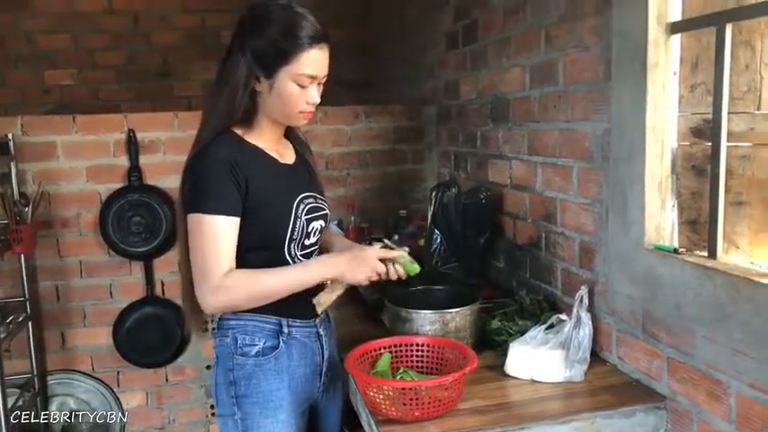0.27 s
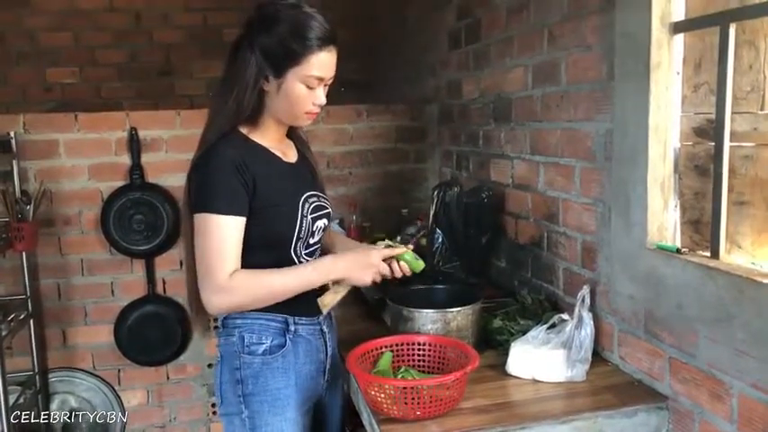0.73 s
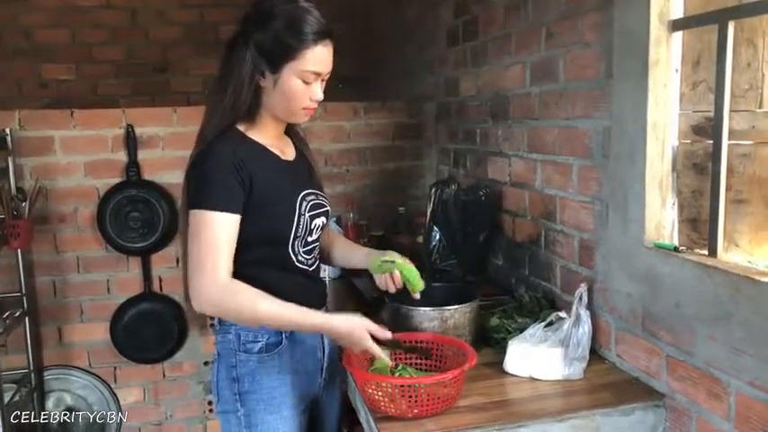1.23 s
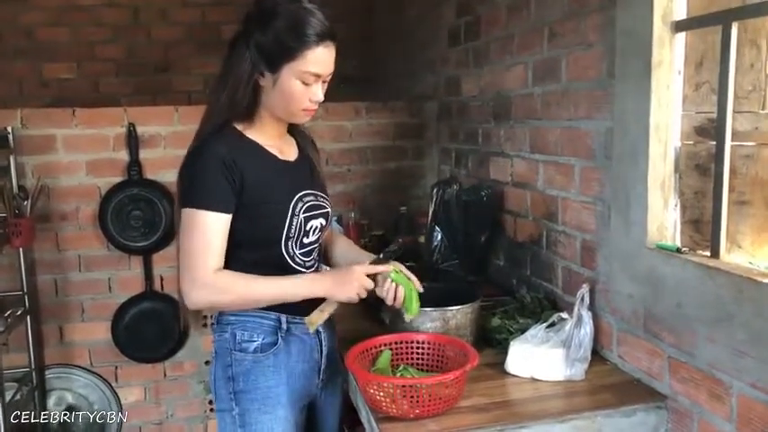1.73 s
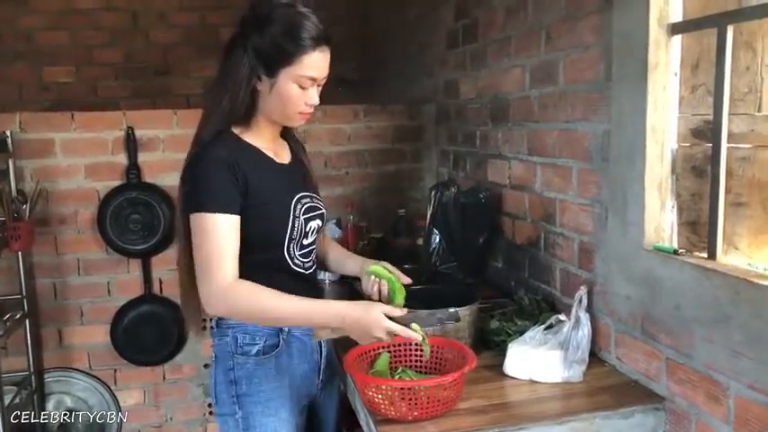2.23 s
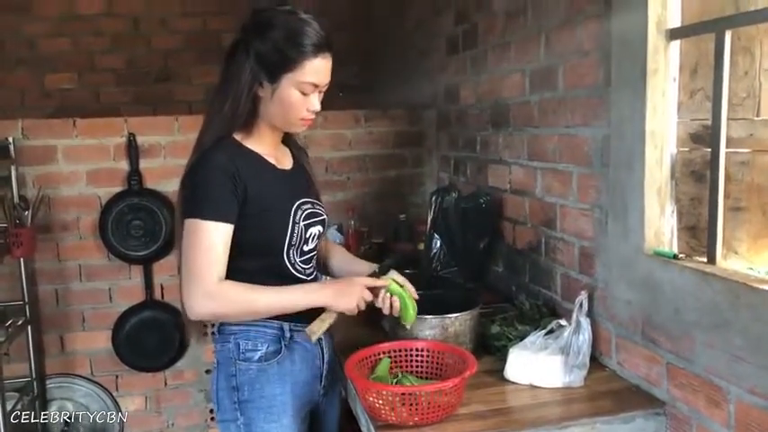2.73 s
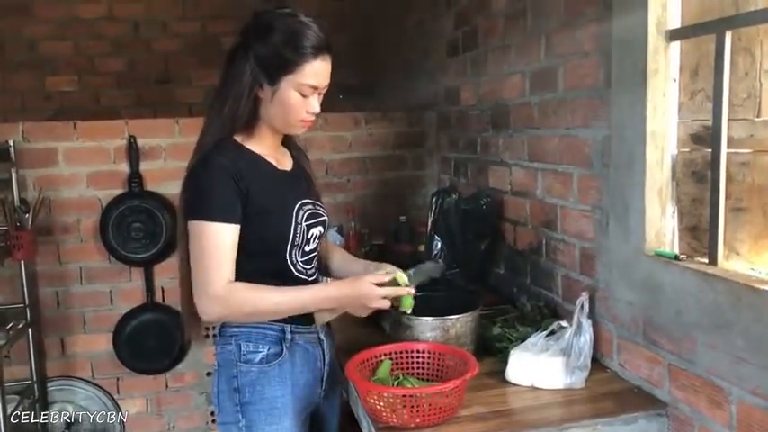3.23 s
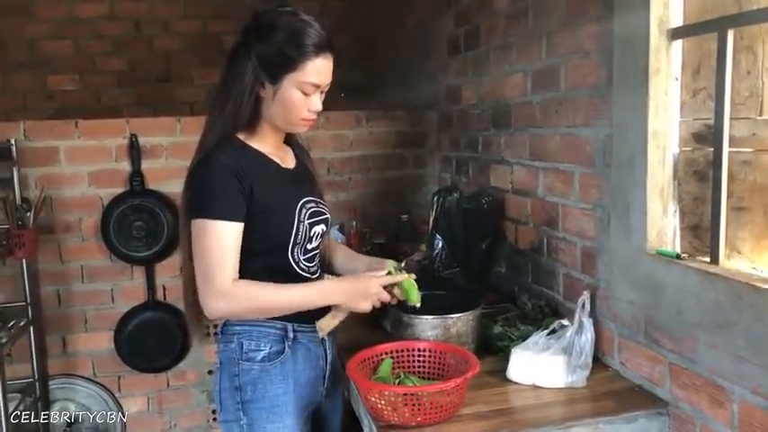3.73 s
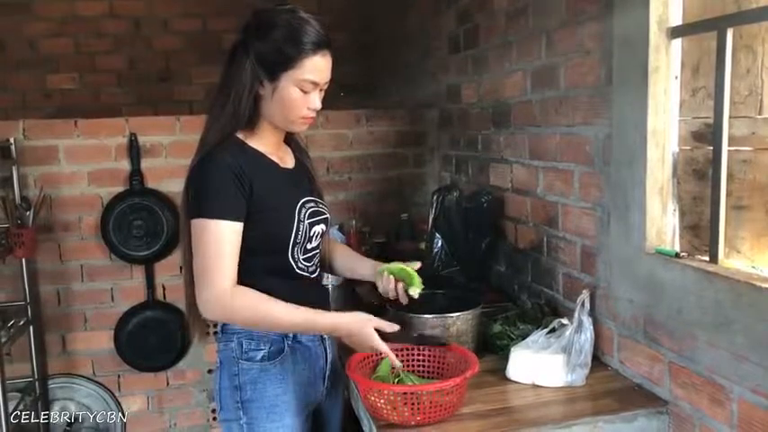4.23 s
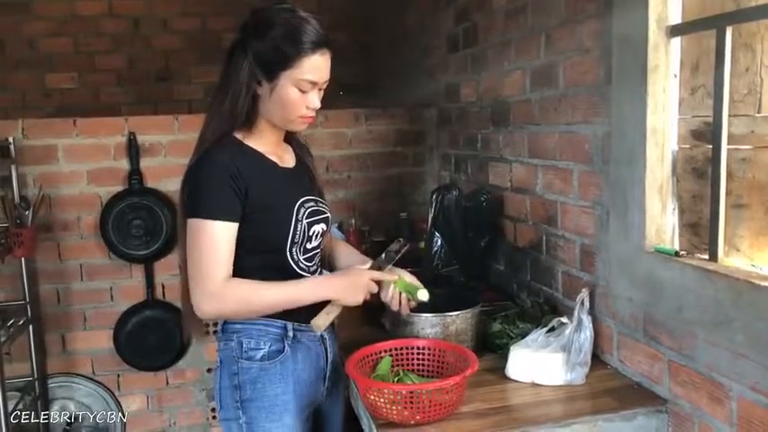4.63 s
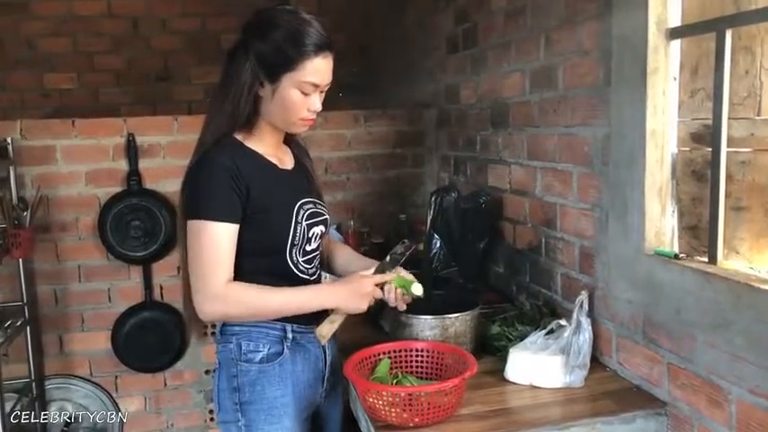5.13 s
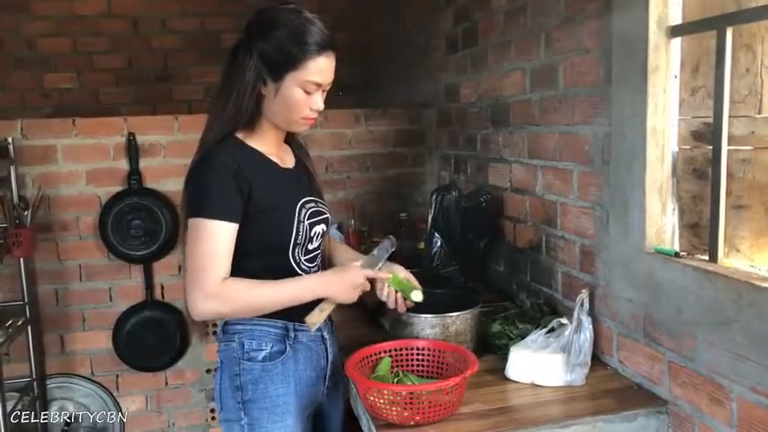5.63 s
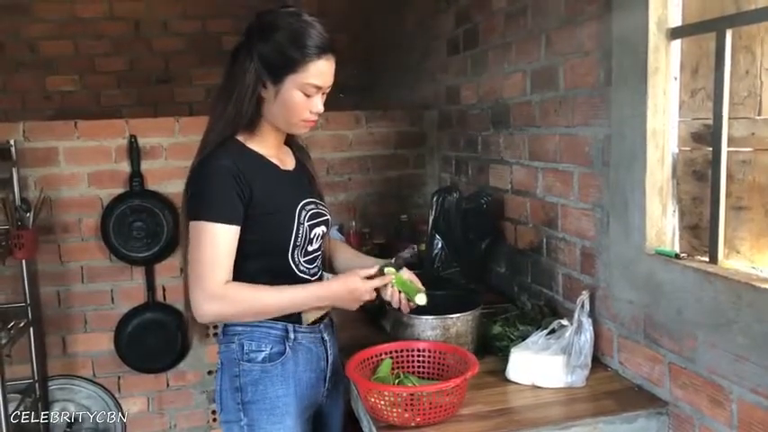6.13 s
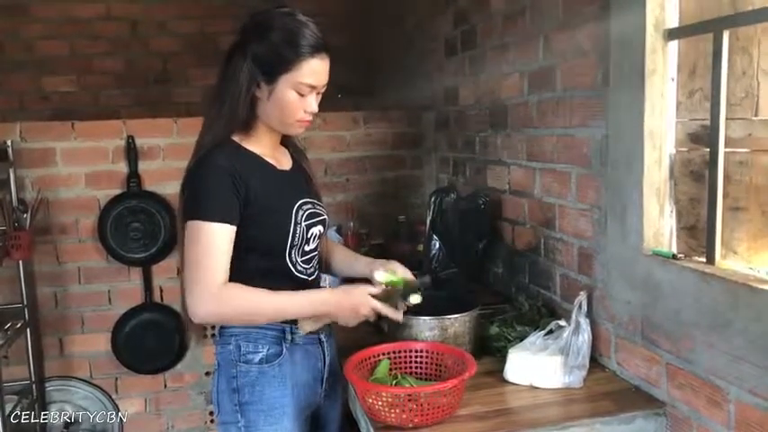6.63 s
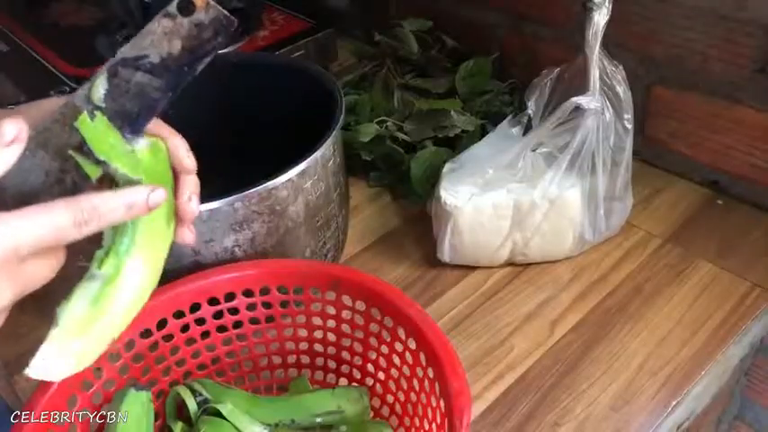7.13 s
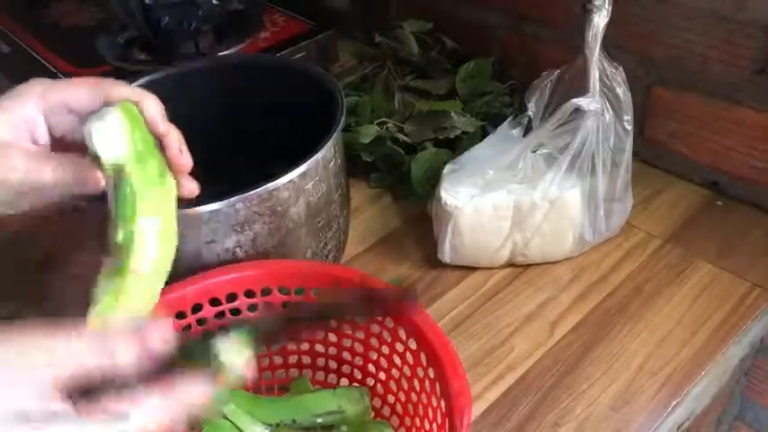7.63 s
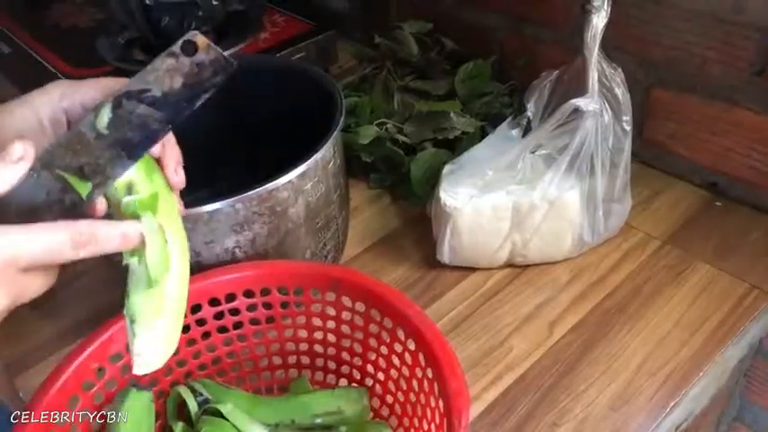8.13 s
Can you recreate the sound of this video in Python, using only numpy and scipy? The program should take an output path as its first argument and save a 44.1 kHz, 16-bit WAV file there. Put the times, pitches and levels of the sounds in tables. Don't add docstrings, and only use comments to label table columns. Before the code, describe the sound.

Crisp wet shaving strokes come in uneven groups with pauses, each a fraction of a second, mixing midrange scrape, fine bright fizz and fibre snaps. A fuzzy metallic flutter leads into a woody, sinking scuff halfway through, then more cuts and a firm chop near the end. Quiet indoor hush, thin insect shimmer and a distant idling engine continue behind; the engine pulls harder after the late scene change. Close microphone, small hard room.

```python
import sys
import numpy as np
from scipy import signal
from scipy.fft import rfft, irfft, next_fast_len
from scipy.io import wavfile
from scipy.ndimage import uniform_filter1d

SR = 44100
rng = np.random.default_rng(int(sys.argv[2]) if len(sys.argv) > 2 else 0)


def how_loud(loudness_db):
    steps = np.asarray(loudness_db, float) / 20
    return 10 ** steps


def unload_wav(signal):
    wavfile.write(
        sys.argv[1],
        SR,
        np.round(np.clip(np.atleast_2d(signal).T, -1, 1) * 32767).astype(np.int16),
    )


N = 369558
T = np.arange(N) / SR

# frequency [Hz], level [dB].
FIZZ_COLOUR = [(3820, -22), (6500, -10), (8530, -4), (11000, -8), (12100, -9.5), (13400, -12), (15100, -24),
               (15600, -23)]


def evened(x):
    return x / np.sqrt(np.mean(x ** 2) + 1e-20)


def shaped(x, points):
    f, db = np.transpose(points)
    n = next_fast_len(len(x), real=True)
    hz = np.fft.rfftfreq(n, 1 / SR)
    gain = how_loud(np.interp(np.log(hz + 1), np.log(f + 1), db))
    return evened(irfft(rfft(x, n) * gain, n)[:len(x)])


def resonate(x, hz, width):
    r = np.exp(-np.pi * width / SR)
    if np.isscalar(hz):
        return 2 * signal.lfilter([1 - r], [1, -r * np.exp(2j * np.pi * hz / SR)], x + 0j).real
    turn = np.exp(2j * np.pi * np.cumsum(hz) / SR)
    return 2 * (turn * signal.lfilter([1 - r], [1, -r], x / turn)).real


def modes(x, table, widen):
    return evened(sum(how_loud(db) * resonate(x, hz, width * widen) for hz, width, db in table))


def add(mix, s, sound):
    part = mix[round(s * SR):][:len(sound)]
    part += sound[:len(part)]


def unrolled(rows):
    s, *columns = np.transpose(rows)
    t = np.arange(s[0], s[-1], 1 / SR)
    return s[0], [np.interp(t, s, c) for c in columns]


def patchy(x, db):
    z = signal.stft(x, nperseg=256, noverlap=192)[2]
    field = uniform_filter1d(rng.standard_normal(z.shape), size=3, axis=0)
    field = uniform_filter1d(field, size=9, axis=1)
    return evened(signal.istft(z * how_loud(db * evened(field)), nperseg=256, noverlap=192)[1][:len(x)])


def tearing(n, per_s, spread_db, lumpy_db, patchy_db):
    chance, size, hiss, slip = rng.random((n, 4)).T
    strength = how_loud(spread_db * np.minimum(-np.log(1 - size), 4))
    fibres = np.sign(hiss - .5) * strength * (chance < per_s / SR)
    clumps = evened(uniform_filter1d(slip - .5, size=180))
    torn = evened(fibres) + 1.01 * evened(hiss - .5)
    return patchy(torn * how_loud(lumpy_db * clumps), patchy_db)


def strokes():
    # frequency [Hz], level [dB].
    flesh_colour = [(300, -11), (1000, -8.5), (1700, -6.5), (2100, 1), (2700, 1), (3500, 0), (4300, -4),
                    (7000, -30)]
    # frequency [Hz], level [dB].
    edge_colour = [(2500, -33), (3800, -3.5), (4500, -4), (5600, -2), (6600, -13.5), (9000, -18)]
    # frequency [Hz], width [Hz], level [dB].
    blade_modes = [(4590, 220, 5.5), (5480, 460, -4), (3800, 270, -21.5)]
    # start [s], push [s], force at the start and at the end [dB],
    # brightness at the start [dB].
    shaves = [(.03, .18, -60, -52.5, -4), (.725, .06, -57.5, -60, -6), (.868, .085, -56.5, -66, -3),
              (.955, .08, -66, -55, 5), (1.832, .14, -66, -66, -3), (1.985, .04, -51, -52, 1.5),
              (2.02, .105, -53, -49.5, 3.2), (3.05, .06, -63, -64, -4), (3.115, .115, -63, -53.5, 0.5),
              (3.59, .1, -62.5, -67, -1.5), (3.732, .09, -62, -60, 0.5), (3.915, .065, -66, -57, 7),
              (3.975, .105, -53.5, -54, 2.5), (5.9, .13, -72, -59, 4), (6.022, .12, -57.5, -59, 2.5),
              (6.19, .06, -66, -65, .5), (6.304, .04, -54, -46.5, 6), (7.125, .094, -60.5, -69, -8),
              (7.225, .165, -62.5, -72, -11), (7.39, .12, -70, -59, .6)]
    # (start [s], push [s], start force [dB], end force [dB], brightness [dB]).
    through_cuts = [
        (2.862, .17, -63, -62.5, -4),
        (5.2, .095, -61, -56, 0.5),
        (7.514, .043, -51, -52, 0.5),
        (7.568, .085, -48, -53, -1.5),
    ]
    # start [s], force [dB], t60 [s], edge on the blade [dB], brightness [dB].
    nicks = [(.32, -59, .3, -1.2, -5), (2.733, -59, .25, -1.2, -6), (5.095, -61, .4, -4, -5),
             (5.34, -64, .5, -1.5, -12), (5.18, -58, .4, -1.2, 11.5), (0.0, -57, .4, 1.5, 8),
             (8.3, -66, .14, 4, -9.5), (6.632, -59, .45, -12, -19), (6.83, -69, .3, 11, -5),
             (6.898, -74, .4, 19.5, 8), (8.116, -59, .2, 1.5, -18), (8.277, -59, .18, 4, -13),
             (8.335, -62, 3, 3, -22)]
    bite_s, nick_bite_s = .011, .006
    lift_db_per_s, break_db_per_s = 205, 650
    edge_db, edge_force_db, edge_sinks = -1.5, -55, .33
    wetting_db_per_s = 25
    fizz_sinks, fizz_lift = .95, .22

    flesh, blade, fizz = np.zeros((3, N))
    rows = [(*row, lift_db_per_s) for row in shaves] + [(*row, break_db_per_s) for row in through_cuts]
    for s, push, start_db, end_db, bright_db, leave_db_per_s in rows:
        t = np.arange(0, push + .2, 1 / SR)
        lean_db = (end_db - start_db) * np.minimum(t / push, 1)
        lift_db = leave_db_per_s * np.maximum(t - push, 0)
        force_db = start_db + lean_db - lift_db
        power = (how_loud(force_db) * np.minimum(t / bite_s, 1)) ** 2
        steel_db = edge_db - edge_sinks * (force_db - edge_force_db)
        fizz_db = bright_db - fizz_sinks * lean_db - fizz_lift * lift_db - wetting_db_per_s * t
        add(flesh, s, power)
        add(blade, s, power * how_loud(steel_db) ** 2)
        add(fizz, s, power * how_loud(fizz_db) ** 2)
    for s, force_db, t60, steel_db, bright_db in nicks:
        t = np.arange(0, t60 / 2, 1 / SR)
        power = (how_loud(force_db - 60 * t / t60) * np.minimum(t / nick_bite_s, 1)) ** 2
        add(flesh, s, power)
        add(blade, s, power * how_loud(steel_db) ** 2)
        add(fizz, s, power * how_loud(bright_db) ** 2)

    thick, scrape, fine = (tearing(N, per_s, spread_db=3.0, lumpy_db=0.5, patchy_db=2.5)
                           for per_s in (2500, 3500, 5000))
    steel = evened(shaped(scrape, edge_colour) + how_loud(-9) * modes(scrape, blade_modes, 3.2))
    sound = np.sqrt(flesh) * shaped(thick, flesh_colour)
    sound += np.sqrt(blade) * steel
    sound += np.sqrt(fizz) * shaped(fine, FIZZ_COLOUR)
    judder = evened(uniform_filter1d(rng.standard_normal(N), size=260))
    return sound * how_loud(1.65 * judder)


def background():
    # frequency [Hz], level [dB].
    hush_colour = [(25, -20), (45, 3.5), (90, -1.5), (150, -3.5), (190, -5.5), (260, -10), (560, -11),
                   (780, -13), (2600, -19), (4250, -21), (5340, -24), (7000, -26), (11500, -35),
                   (15600, -46)]
    # time [s], level [dB].
    insect_levels = [(0, -77), (1.35, -75), (1.9, -79), (2.65, -75), (3.4, -77), (4.2, -86.5), (5.6, -74.5),
                     (6.5, -77), (8.38, -75)]
    # frequency [Hz], level [dB].
    air_colour = [(2, -8.5), (5, -0.5), (12, 0.5), (20, -6), (27, -17.5), (36, -31), (60, -62.5)]
    # time [s], level [dB].
    air_levels = [(0.0, -32.5), (0.4, -41), (0.51, -36), (2.22, -37.5), (2.71, -40.5), (4.01, -35.5),
                  (4.15, -44), (4.97, -35.5), (6.18, -39), (6.33, -34.5), (8.24, -44), (8.38, -33.5)]

    room, wings, wind, wander = rng.standard_normal((4, N))
    drift = shaped(wander, [(0, 0), (2, 0), (12, -30), (30, -80)])
    hush = shaped(room, hush_colour) * how_loud(.5 * drift)
    hush *= how_loud(-62) / np.std(signal.lfilter(*signal.butter(4, 200, "high", fs=SR), hush))
    shimmer = evened(resonate(resonate(wings, 5260, 500), 5260, 500))
    shimmer *= how_loud(np.interp(T, *np.transpose(insect_levels)))
    air = how_loud(np.interp(T, *np.transpose(air_levels))) * shaped(wind, air_colour)
    return hush + shimmer + air * signal.windows.tukey(N, .012)


def rubs():
    # start [s], length [s], level [dB], pitch [Hz], width [Hz].
    steady_rubs = [(.17, .085, -63, 4330, 250), (1.251, .15, -71, 2570, 250), (1.83, .11, -70, 2700, 300),
                   (2.09, .076, -55, 4430, 300), (2.17, .046, -60.5, 1430, 220), (2.878, .13, -62, 3600, 380),
                   (3.73, .12, -59, 3650, 350), (3.97, .13, -53.5, 2560, 300), (4.474, .12, -59.5, 970, 40),
                   (4.625, .13, -54, 640, 110), (4.486, .049, -64, 1620, 200), (4.496, .04, -64, 3270, 200),
                   (4.643, .3, -59, 392.4, 12), (4.775, .115, -58.5, 605, 32), (5.901, 1.9, -68.5, 229, 76),
                   (5.14, .25, -72, 3470, 400), (5.342, .1, -67, 1620, 100), (5.34, .042, -66, 7200, 300),
                   (7.562, .105, -49.5, 4900, 1500), (7.512, .045, -52, 5300, 900),
                   (2.15, .075, -57, 4600, 1500), (8.115, .045, -61, 3500, 600), (6.03, .12, -60, 2350, 400),
                   (7.58, .08, -54, 1700, 800),
                   (4.615, .135, -56, 1680, 140), (4.76, .07, -61, 1680, 140), (4.8, .11, -65, 1480, 200),
                 (5.095, .045, -62, 3470, 400), (5.248, .058, -58, 3470, 250),
                 (5.255, .055, -59, 1800, 600), (3.735, .11, -65, 2400, 250), (3.59, .06, -66, 3700, 600),
                 (3.9, .075, -64, 2400, 250), (3.92, .06, -64, 12200, 900), (3.05, .025, -62, 12500, 5000),
                 (2.97, .03, -65, 11000, 4000), (3.115, .1, -64, 12500, 5000), (3.11, .08, -62, 3400, 350),
                 (3.12, .06, -63, 5500, 400), (4.03, .05, -59, 13000, 4000), (8.345, .035, -55, 4300, 700),
                 (8.21, .06, -65, 3800, 1500), (2.04, .07, -57, 8900, 500), (7.53, .03, -54, 9000, 1200),
                 (3.2, .045, -56, 2900, 1200), (7.23, .11, -65, 4800, 250), (5.94, .08, -65, 5500, 300),
                 (6.318, .022, -50, 4100, 700), (6.3, .04, -52, 2400, 900), (6.315, .025, -53, 7400, 1200),
                 (6.345, .02, -53, 8600, 1500), (7.548, .018, -48, 4650, 400),
                 (7.549, .014, -52, 8000, 1800), (7.57, .025, -49, 4000, 1800),
                 (7.512, .06, -57, 2700, 500), (2.9, .1, -61, 4200, 700), (2.9, .14, -65, 7500, 2500),
                 (3.125, .09, -63, 7200, 1500), (2.075, .04, -55, 4400, 900), (2.17, .045, -60, 2700, 700),
                 (4.49, .055, -60, 2400, 2000), (5.186, .025, -55, 2500, 2500),
                 (8.36, .03, -58, 2500, 2500), (.03, .2, -62, 4500, 500)]
    # start [s], length [s], level [dB], start pitch [Hz], width [Hz].
    closing_rubs = [(.1, .15, -55, 3150, 350), (2.07, .12, -56.5, 2750, 390),
                    (3.145, .11, -54.5, 2490, 700), (6.335, .06, -53, 2700, 300),
                    (6.644, .15, -68, 1210, 850), (7.149, .27, -63, 850, 1400),
                    (8.113, .041, -59, 630, 750), (8.335, .044, -60.5, 435, 500)]
    # start [s], t60 [s], level
    # [dB], pitch [Hz], width [Hz].
    struck = [(4.55, .2, -49, 1930, 120), (4.575, .35, -50, 2080, 200), (4.552, .25, -54, 4100, 300),
              (4.572, .4, -55, 4660, 120), (4.632, .25, -59, 2610, 90), (4.325, .5, -58, 4680, 200),
              (4.385, .4, -67, 4680, 200), (4.39, .2, -59, 5600, 200), (4.478, .1, -62, 8500, 500),
              (1.834, .07, -55, 3650, 350), (1.866, .07, -57, 3600, 350), (1.897, .07, -55, 3650, 350),
              (1.921, .07, -55, 3680, 350), (1.954, .06, -60, 3300, 1500), (1.918, .07, -62, 8500, 2500),
              (1.954, .06, -63, 8500, 2500), (5.188, .15, -52, 3470, 350), (5.355, .12, -61, 5840, 120),
              (5.36, .2, -64, 4600, 200), (.657, .2, -62, 1120, 80), (7.74, .4, -64, 1590, 60),
              (7.74, .4, -66, 1230, 60), (8.117, .2, -56, 5420, 300), (8.13, .25, -63, 7200, 200),
              (6.347, .1, -47, 2600, 400), (6.322, .1, -51, 2000, 400), (6.356, .05, -54, 600, 400),
              (6.652, .4, -62, 5200, 500), (6.897, .3, -60, 8800, 600), (6.9, .25, -61, 5300, 500),
              (1.99, .15, -52, 2740, 300), (2.008, .12, -50, 3450, 400), (2.008, .15, -52, 8500, 1800),
              (.21, .2, -54, 2650, 200), (6.078, .4, -57, 4100, 250), (6.033, .2, -57, 3600, 500)]
    closed_pitch, wander = .81, .012
    lead = 1500

    out = np.zeros(N)
    skin = tearing(N + SR, per_s=2500, spread_db=0.5, lumpy_db=2.0, patchy_db=-1.5)
    stray = evened(uniform_filter1d(rng.standard_normal(N + SR), size=500))
    for rows, end, fades in ((steady_rubs, 1, False),
                             (closing_rubs, closed_pitch, False), (struck, 1, True)):
        for s, length, db, hz, width in rows:
            t = np.arange(-lead, round(length * SR)) / SR
            first = round(s * 50) * SR // 50
            at = slice(first, first + len(t))
            glide_hz = hz * np.interp(t, [0, length], [1, end]) * (1 + wander * stray[at])
            note = evened(resonate(resonate(skin[at], glide_hz, width), glide_hz, width))
            note = (note / np.sqrt(uniform_filter1d(note ** 2, size=1300) + .2))[lead:]
            if fades:
                shape = np.minimum(t[lead:] / .003, 1) * how_loud(-60 * t[lead:] / length)
            else:
                shape = signal.windows.tukey(len(note), .4)
            add(out, s, how_loud(db) * note * shape)
    return out


def engine():
    # time [s], firing cycle [Hz], level [dB].
    idle = [
        (.317, 28.1, -63),
        (3, 28.15, -63),
        (5.2, 28.36, -60),
        (6.83, 28.4, -60),
    ]
    # multiple of the firing cycle, level [dB].
    idle_orders = [(2, -4), (4, -4.5), (5, -2), (8, -14.5)]
    # time [s], firing cycle [Hz], level [dB].
    pull = [
        (6.83, 25, -60),
        (7.5, 25.96, -55.5),
        (8, 26.17, -56.5),
        (8.38, 27.3, -61.5),
    ]
    # multiple of the firing cycle, level [dB].
    pull_orders = [(1, -17.5), (2, 5), (3, -8), (4, -6.5), (5, -3), (6, -7.5), (8, -16), (9, -16)]

    out = np.zeros(N)
    for rows, orders in ((idle, idle_orders), (pull, pull_orders)):
        s, (hz, db) = unrolled(rows)
        turns = np.cumsum(hz) / SR
        for k, order_db in orders:
            waver = shaped(rng.standard_normal(len(hz)), [(0, 0), (1.5, 0), (5, -40)])
            tone = np.sin(2 * np.pi * (k * turns + rng.random()))
            add(out, s, np.sqrt(2) * how_loud(db + order_db + 0.88 * waver) * tone)
    return out


def snaps():
    # time [s], peak level [dB], pitch
    # [Hz].
    thick_fibres = [(0.8857, -45, 2450), (0.9024, -40, 3230), (1.035, -37, 2690), (1.193, -55, 1200),
                    (1.8385, -46, 3620), (1.8672, -54, 3330), (1.8991, -45, 3610), (1.923, -46, 3680),
                    (1.9874, -41, 3030), (1.995, -41, 2740), (2.0147, -35, 3380), (2.561, -42, 2220),
                    (2.8639, -51, 4210), (6.2993, -46, 2330), (6.3062, -50, 2260), (6.636, -43, 1525),
                    (6.6365, -46, 2800), (6.6523, -43, 4200), (6.717, -48, 1500), (6.8325, -48, 1400),
                    (6.9072, -42, 5440), (7.5207, -38, 5380), (7.5529, -32, 4660), (8.1186, -47, 5420),
                    (8.2796, -46, 2860), (3.5952, -48, 2450), (3.7399, -48, 2310), (3.1227, -47, 3490),
                    (8.3523, -50, 4480)]
    # time [s], peak level [dB], pitch [Hz].
    thin_fibres = [(0.9174, -43, 8550), (1.0335, -36, 8430), (5.2145, -28, 11300), (5.2253, -39, 9240),
                   (5.2424, -42, 11000), (5.2658, -32, 9740), (6.2018, -45, 8720), (6.23, -44, 12500),
                   (6.2816, -47, 9680), (3.9987, -42, 9000), (4.0182, -41, 11000), (4.0426, -39, 12000),
                   (4.054, -42, 12000), (4.066, -40, 12500), (3.179, -46, 11600), (3.203, -45, 11500),
                   (3.123, -49, 9000), (3.947, -47, 9000), (6.07, -47, 9000), (6.1, -47, 11000),
                   (6.2995, -38, 9220), (6.3295, -32, 9370), (6.349, -28, 9400), (6.134, -45, 12500),
                   (7.6294, -34, 10700), (7.9895, -40, 10000), (4.3165, -43, 7000), (7.592, -36, 9000)]

    out, t = np.zeros(N), np.arange(300) / SR
    for rows, cut in ((thick_fibres, .15), (thin_fibres, .6)):
        for s, db, hz in rows:
            grit = evened(resonate(rng.standard_normal(300), hz, 0.64 * hz))
            ring = np.sin(2 * np.pi * hz * t) * np.exp(-t * hz / 1.5)
            snap = ring + 0.22 * grit * np.exp(-t / 0.0027)
            low_cut = signal.butter(3, cut * hz, "high", fs=SR)
            add(out, s, how_loud(db + 3.5) * signal.lfilter(*low_cut, snap))
    return out


def bumps():
    # time [s], peak level [dB], pitch [Hz], t60 [s].
    knocks = [(1.262, -47, 79, 0.083), (1.39, -56, 60, 0.11), (1.74, -55.5, 75, 0.11),
              (5.031, -49.5, 100, 0.075), (5.889, -52.5, 70, 0.095), (6.551, -49, 80.6, .1),
              (6.641, -42.5, 106, 0.067), (6.766, -42.5, 77.6, 0.11), (2.56, -56.5, 560, 0.046),
              (6.711, -54.5, 410, 0.051), (8.13, -66, 370, 0.088)]
    out, t = np.zeros(N), np.arange(SR // 4) / SR
    for s, db, hz, t60 in knocks:
        level = how_loud(db + 13.5 - 60 * t / t60) * (1 - np.exp(-t / 0.0073))
        add(out, s, level * np.sin(2 * np.pi * hz * t))
    return out


def singing():
    # time [s], level [dB].
    brushes = [
        [(4.312, -60), (4.322, -54), (4.378, -62), (4.394, -56), (4.47, -64), (4.52, -54), (4.544, -59),
         (4.55, -54)],
        [(7.988, -54), (7.99, -51), (8.11, -69)],
    ]
    # frequency [Hz], width [Hz], level [dB].
    blade_songs = [
        [(4700, 62, 3), (5800, 110, 4.5), (6560, 58, 2), (7100, 31, 0), (8100, 110, -1), (9480, 72, -10),
         (12000, 41, -8)],
        [(4800, 100, -20), (5860, 97, -13), (6760, 40, 1), (7500, 67, -8), (8540, 70, 7), (9300, 120, 0),
         (10600, 41, 4), (11800, 87, -2), (14200, 80, -19)],
    ]
    out = np.zeros(N)
    for rows, table in zip(brushes, blade_songs):
        s, (db,) = unrolled(rows)
        drive = tearing(SR // 3, per_s=4000, spread_db=1.0, lumpy_db=2.2, patchy_db=1.5)[:len(db)]
        song = evened(modes(drive, table, 3.4) + 0.35 * shaped(drive, FIZZ_COLOUR))
        add(out, s, how_loud(db + 1.2) * song)
    return out


def drag_level(t, rise, rise_db, top_db, slow, hold, fast):
    climb_db = rise_db * np.maximum(1 - t / rise, 0)
    sag_db = slow * np.clip(t - rise, 0, hold)
    fall_db = fast * np.maximum(t - rise - hold, 0)
    return how_loud(top_db - climb_db - sag_db - fall_db)


def scuff():
    # frequency [Hz], width [Hz], level [dB].
    board_modes = [(116, 14, -5), (264, 44, 2), (330, 71, -4), (393, 12, 2), (494, 34, 0), (600, 20, 3.5),
                   (673, 15, -11), (764, 15, -22)]
    # frequency [Hz], width [Hz], level [dB].
    ring_modes = [(1190, 80, 0), (1440, 130, 6), (1700, 40, 14), (2290, 79, 0), (2610, 48, -12)]
    # frequency [Hz], level [dB].
    grit_colour = [(1940, -31), (3300, -11), (4560, 1), (4950, -6), (6300, -9), (8700, -11.5), (15000, -52)]
    start_s, length_s = 4.545, .475
    slide_start_hz, slide_end_hz, slide_s = 1990, 1620, .24

    out, t = np.zeros(N), np.arange(0, length_s, 1 / SR)
    low, mid, high = (tearing(len(t), per_s=3000, spread_db=1.5, lumpy_db=2.1, patchy_db=2.3)
                      for _ in range(3))
    slide_hz = slide_start_hz + (slide_end_hz - slide_start_hz) * np.minimum(t / slide_s, 1)
    boards = modes(low, board_modes, 1.74)
    ring = evened(modes(mid, ring_modes, 2.2) + how_loud(4.0) * evened(resonate(mid, slide_hz, 450)))
    grit = shaped(high, grit_colour)
    boards *= drag_level(t, rise=.1, rise_db=24, top_db=-47, slow=70, hold=.28, fast=200)
    ring *= drag_level(t, rise=.009, rise_db=25, top_db=-48.5, slow=35, hold=.12, fast=115)
    grit *= drag_level(t, rise=.012, rise_db=25, top_db=-46, slow=90, hold=.1, fast=190)
    add(out, start_s, boards + ring + grit)
    return out


def kitchen(x):
    taps = np.zeros(SR // 2)
    at = np.arange(200, SR // 2 - 20, 20)
    taps[at + rng.integers(0, 20, len(at))] = rng.choice([-1., 1.], len(at))
    t = np.arange(len(taps)) / SR
    dull = signal.lfilter(*signal.butter(2, 6000, fs=SR), taps)
    tail = dull * how_loud(-60 * t / .32) + (taps - dull) * how_loud(-60 * t / 0.16)
    return signal.fftconvolve(x, tail / np.linalg.norm(tail))[:N]


def scene():
    near = strokes() + rubs() + snaps() + singing() + scuff()
    far = background() + engine()
    return (how_loud(-1.0) * near + how_loud(-10.5) * kitchen(near) + bumps() + far)[None]


def top_cut(x):
    return signal.sosfilt(signal.butter(12, 15760, fs=SR, output="sos"), x)


def record(dry):
    # time [s], jump in pressure [full scale].
    changes = [
        (0.3175, 0.024),
        (6.832, 0.0041),
    ]
    steps = sum(jump * (T >= s) * np.exp(-np.maximum(T - s, 0) / .018) for s, jump in changes)
    low_pass = signal.firwin(401, 15700, window=("kaiser", 8), fs=SR)
    padded = np.pad(dry + steps, ((0, 0), (200, 200)), "reflect")
    return top_cut(signal.oaconvolve(padded, low_pass[None], "valid"))


dry = scene()
out = record(dry)
unload_wav(out)
```